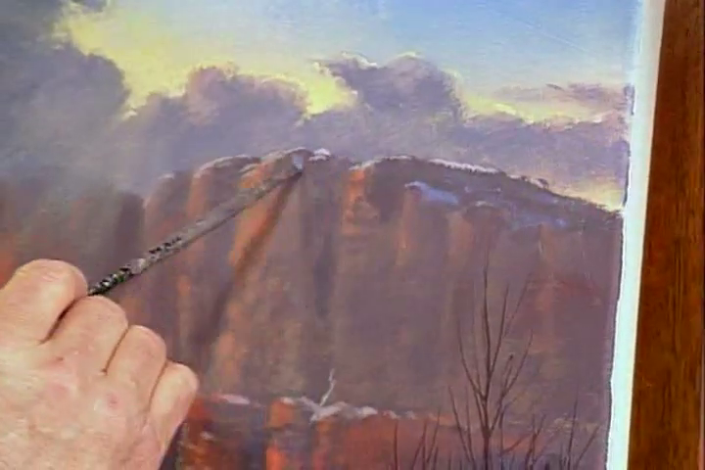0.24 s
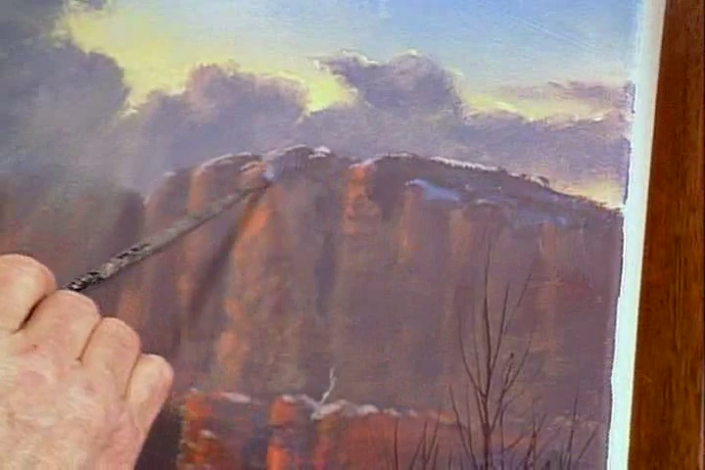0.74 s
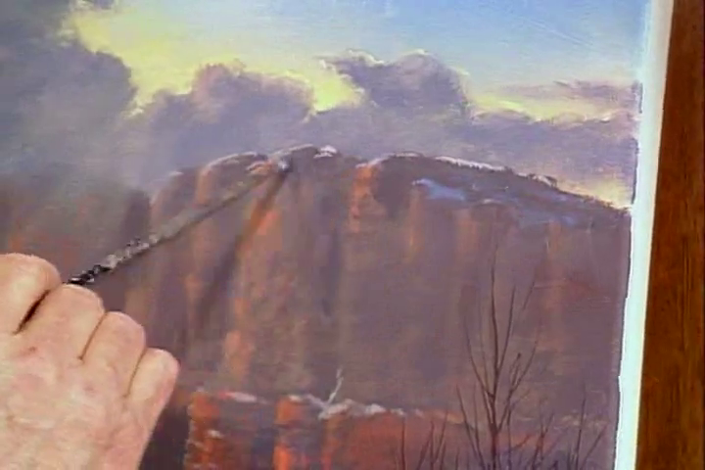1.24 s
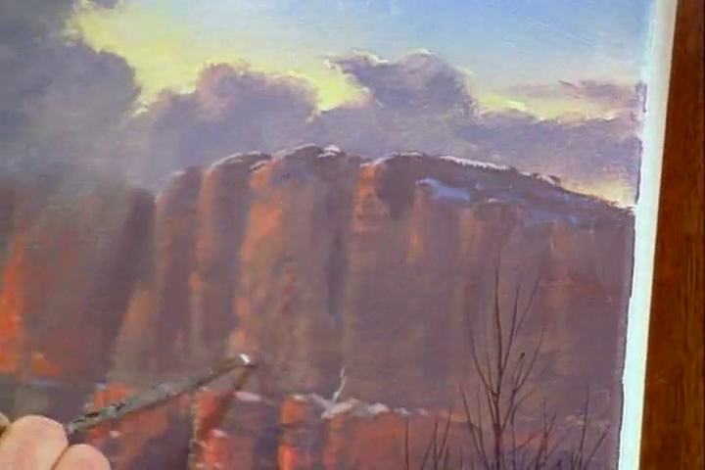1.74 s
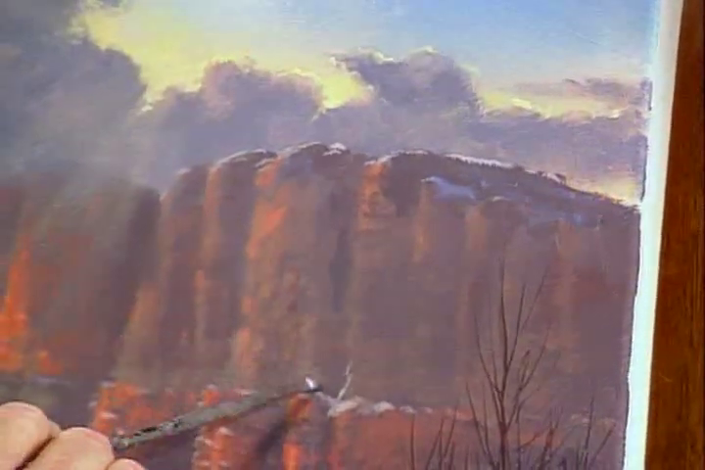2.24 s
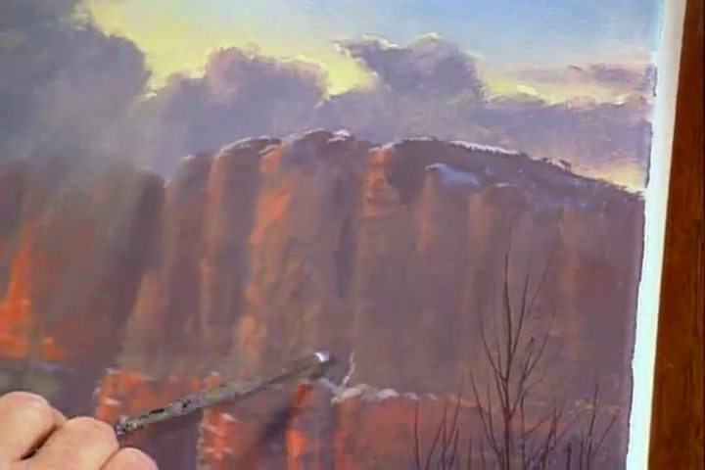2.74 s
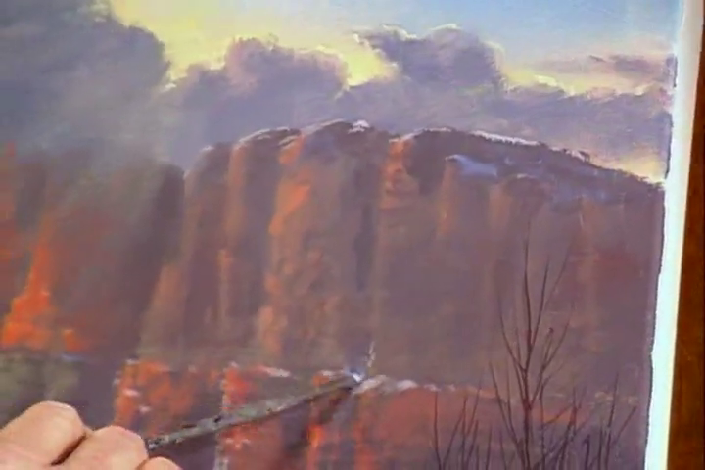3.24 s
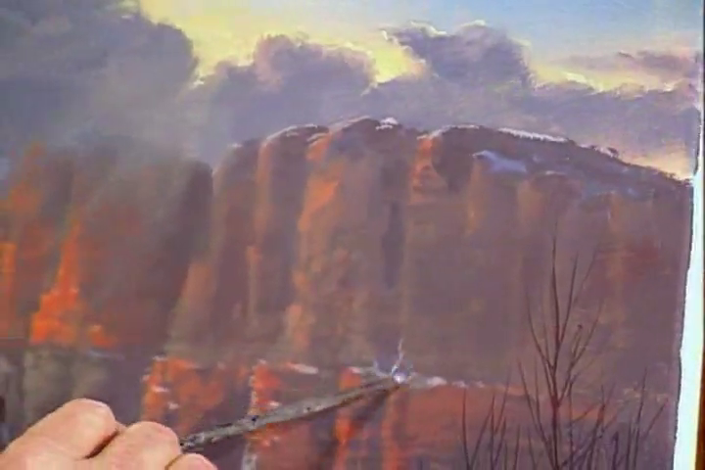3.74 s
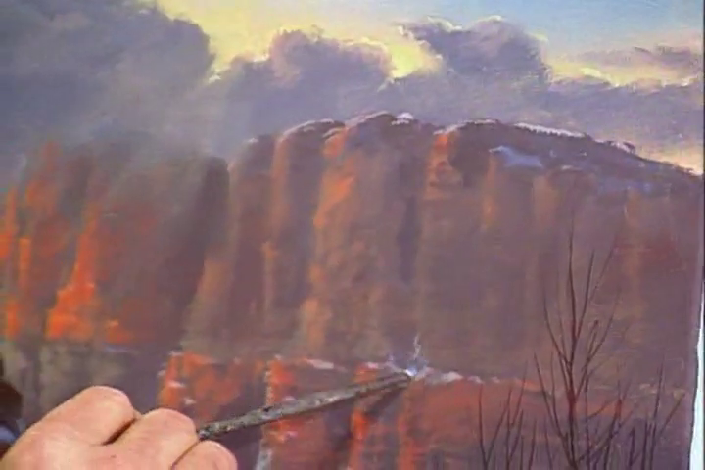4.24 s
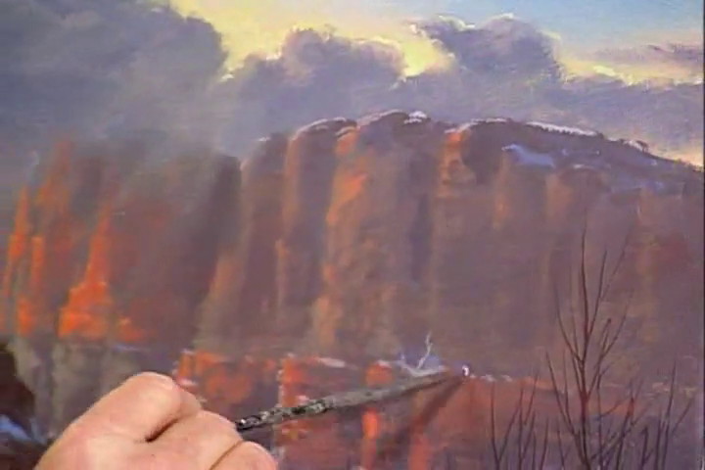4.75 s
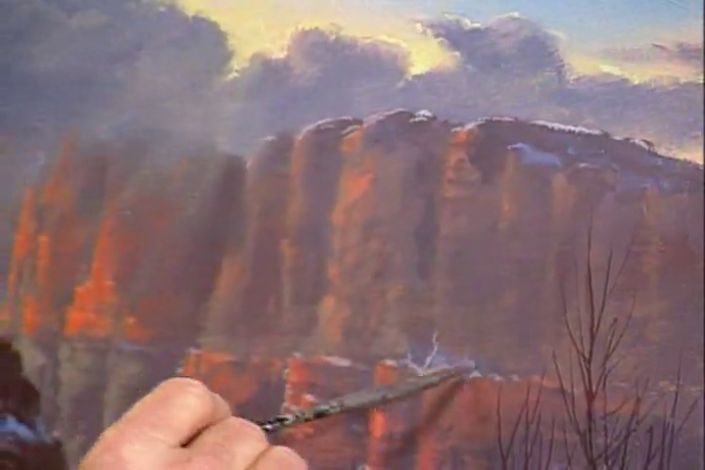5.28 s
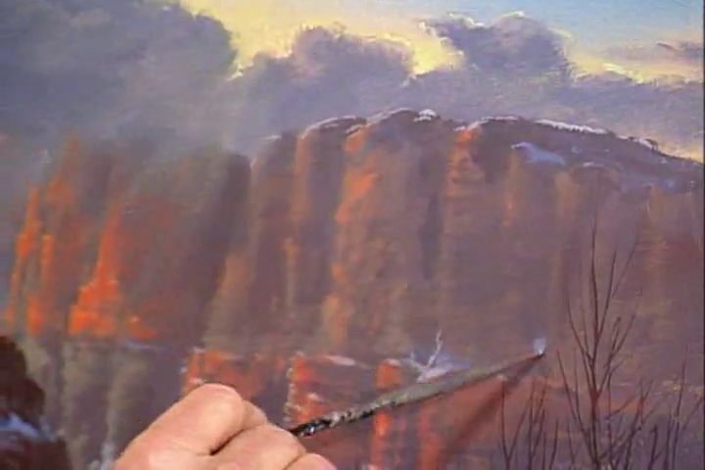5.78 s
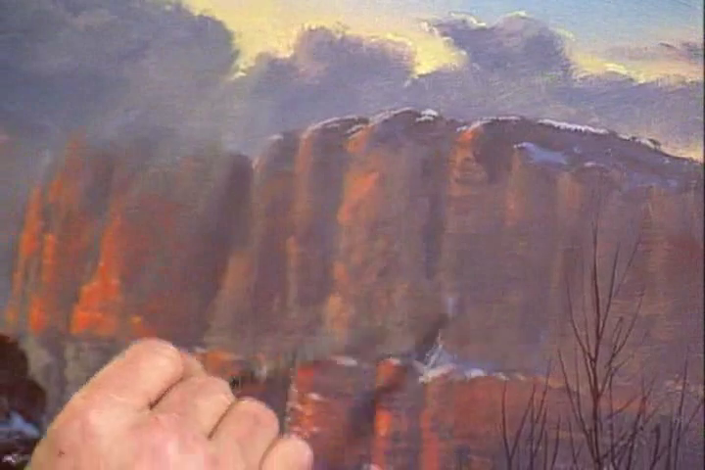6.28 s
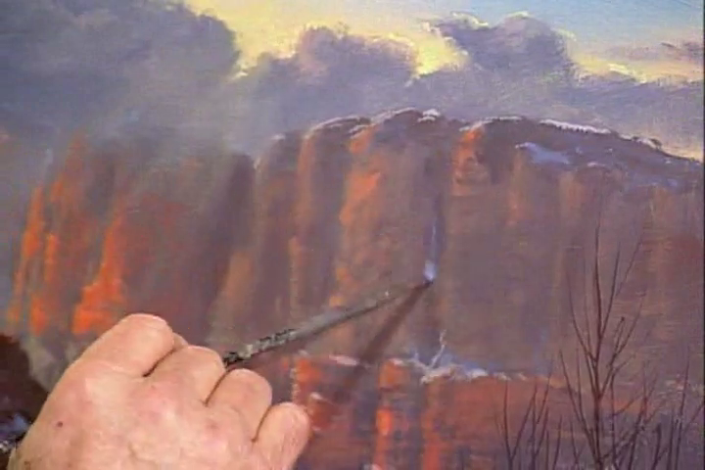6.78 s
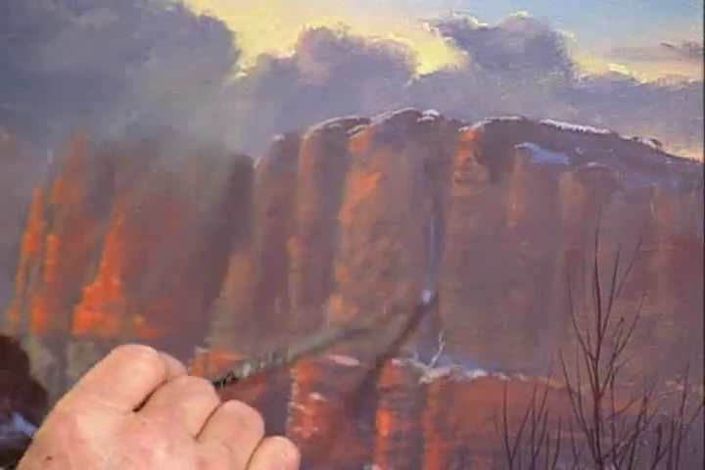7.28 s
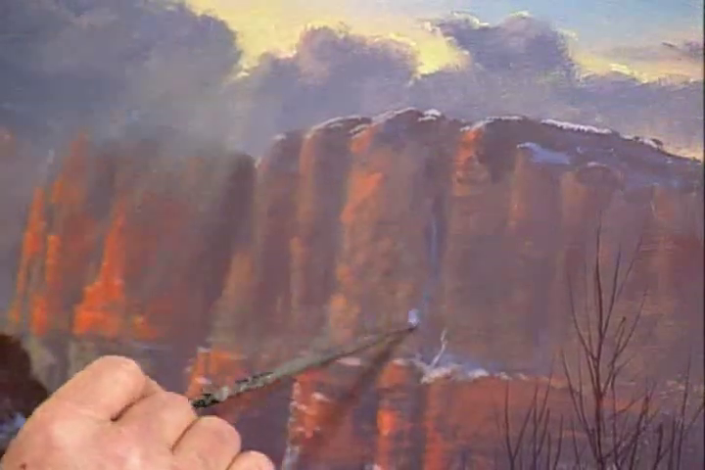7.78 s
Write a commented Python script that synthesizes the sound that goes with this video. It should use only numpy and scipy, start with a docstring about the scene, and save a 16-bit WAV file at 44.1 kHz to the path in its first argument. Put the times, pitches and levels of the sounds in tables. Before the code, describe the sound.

Soft scratchy brush strokes and faint taps on stretched canvas, with a low electrical hum in a quiet room.

```python
"""Bristle brush on canvas

A small brush works paint onto a canvas in a quiet studio: quick scrubs, then light strokes and dabs.
Stick-slip friction on the weave makes the bristles hiss and drives the cloth, a stretched membrane,
into soft drumming. Mains hum, a fan, a thin electronic whine and low room noise lie under it all."""
import sys
import numpy as np
from scipy import signal
from scipy.fft import rfft, irfft, next_fast_len
from scipy.io import wavfile
from scipy.ndimage import map_coordinates

SR = 44100
rng = np.random.default_rng(int(sys.argv[2]) if len(sys.argv) > 2 else 0)


def unload_wav(signal):
    """Save mono or channel-first audio to the path in sys.argv[1] as 16-bit WAV at rate SR, clipped to [-1, 1]."""
    wavfile.write(
        sys.argv[1],
        SR,
        np.round(np.clip(np.atleast_2d(signal).T, -1, 1) * 32767).astype(np.int16),
    )


N = 353682


def amp(db):
    """Amplitude ratio of a level in decibels."""
    return 10 ** (np.asarray(db) / 20)


def unit(x):
    """Normalisation to rms 1."""
    return x / np.sqrt(np.mean(x ** 2) + 1e-20)


def seconds():
    """The time of every sample."""
    return np.arange(N) / SR


def wobble(rate):
    """Smooth random modulation: a spline through `rate` Gaussian knots a second."""
    return map_coordinates(rng.standard_normal(int(N * rate / SR) + 4), [seconds() * rate])


def filtered(x, response):
    """Linear filtering: the spectrum of x times a frequency response."""
    size = next_fast_len(N + SR // 2)
    return irfft(rfft(x, size) * response(np.fft.rfftfreq(size, 1 / SR)), size)[:N]


def coloured(x, spectrum):
    """Spectral shaping by (frequency [Hz], gain [dB]) points on a log axis, at rms 1."""
    f, db = np.transpose(spectrum)
    return unit(filtered(x, lambda hz: amp(np.interp(np.log(hz + 1), np.log(f), db))))


def boosted(x, peaks, half_width=.095):
    """Resonances and valleys: a Gaussian hump or dip for each (frequency [Hz], gain [dB]) pair."""
    pairs = np.reshape(peaks, (-1, 2))
    return filtered(x, lambda f: amp(sum(db * np.exp(-((f / hz - 1) / half_width) ** 2)
                                         for hz, db in pairs)))


def resonance(x, centre_hz, width_hz):
    """Forced response of one damped mode, at rms 1."""
    return unit(signal.lfilter(*signal.iirpeak(centre_hz, centre_hz / width_hz, SR), x))


def reflected(x, delay_ms, share):
    """Comb filtering: x interferes with a weaker, later copy."""
    return (x + share * np.roll(x, round(delay_ms * SR / 1000))) / np.hypot(1, share)


def rings(events, attack, t60):
    """Free decay of a struck mode for each (time [s], peak level [dB], frequency [Hz]) row."""
    out, t = np.zeros(N + SR), np.arange(SR // 4) / SR
    for start, db, hz in events:
        onset = 1 - np.exp(-(t / attack) ** 2)
        ring = np.sin(2 * np.pi * hz * t) * onset * amp(-60 * t / t60)
        out[round(start * SR):][:len(t)] += amp(db) * ring / np.abs(ring).max()
    return out[:N]


def tone(hz, db, waver_rad):
    """A sinusoid of given rms level under random phase modulation."""
    phase = 2 * np.pi * (hz * seconds() + rng.random()) + waver_rad * wobble(2.31)
    return np.sqrt(2) * amp(db) * np.sin(phase)


def background(mains_hz=60.01, whine_hz=1500):
    """Superposition of line spectra (hum, fan, whine) and the continuous spectrum of room noise."""
    # slow drift: (time [s], hum gain [dB], rumble level [dB], midrange noise level [dB])
    drift = [(0, 0, -62.5, -68), (1.7, -0.4, -87, -83), (4, -1.25, -64.5, -70), (8, -0.5, -67, -71)]
    # mains hum: (harmonic number, rms level [dB])
    hum_harmonics = [(1, -43.5), (2, -64.5), (3, -60), (4, -74), (5, -66.5), (6, -78), (7, -70.5),
                     (9, -78.5), (10, -77.5), (11, -86)]
    # fan motor: (frequency [Hz], rms level [dB])
    fan_partials = [(30.1, -57), (116.2, -67.5), (497, -76.5), (539, -79.5), (839.3, -83), (1077.7, -93)]
    # electronic whine: (harmonic number, rms level [dB])
    whine_harmonics = [(1, -79.4), (2, -86.3), (3, -86.1), (4, -88.2), (5, -86.8), (6, -87.2), (8, -82),
                       (9, -93), (10, -102)]
    # steady rumble and hiss: (frequency [Hz], relative spectral density [dB])
    air_spectrum = [(8, 1.5), (14, 4), (75, -1), (120, 3), (200, -2.5), (300, -11), (520, -15.5),
                    (720, -21), (1300, -27), (2600, -29.5), (10000, -30.5), (11800, -37.5), (12900, -46),
                    (15000, -48)]
    times, *levels = np.transpose(drift)
    hum_gain, rumble_gain, wash_gain = (amp(np.interp(seconds(), times, db)) for db in levels)
    hum = sum(tone(k * mains_hz, db, waver_rad=.02) for k, db in hum_harmonics)
    fan = sum(tone(hz, db, waver_rad=.24) for hz, db in fan_partials)
    whine = sum(tone(k * whine_hz, db, waver_rad=.017) for k, db in whine_harmonics)
    air = amp(-57.5) * coloured(rng.standard_normal(N), air_spectrum)
    rumble = coloured(rng.standard_normal(N),
                      [(70, -18.5), (120, .5), (180, -4), (270, -9), (450, -32), (1200, -57)])
    wash = coloured(rng.standard_normal(N), [(120, -20), (260, 0), (500, -.5), (800, -6),
                                             (1500, -18), (3000, -31.5), (8000, -48)])
    return hum_gain * hum + fan + whine + air + rumble_gain * rumble + wash_gain * wash


def reverberation(x, t60):
    """Diffuse wall reflections: convolution with exponentially decaying noise."""
    t = np.arange(SR // 2) / SR
    tail = rng.standard_normal(len(t)) * amp(-60 * t / t60) * (t > .003)
    return signal.fftconvolve(x, tail / np.linalg.norm(tail))[:N]


def catches(rate, spread_db):
    """Stick-slip as a Poisson process: bristles slip off threads in impulses of random size."""
    slipping = rng.random(N) < rate / SR
    return unit(slipping * rng.standard_normal(N) * amp(spread_db * rng.standard_normal(N)))


def contact(peak_s, rise, fall):
    """Contact force envelope: the brush presses in and lifts off in one smooth arc."""
    t = seconds() - peak_s
    arc = np.zeros(N)
    touching = (t > -rise) & (t < fall)
    t = t[touching]
    arc[touching] = np.cos(np.pi / 2 * t / np.where(t < 0, rise, fall)) ** 1.37
    return arc


def dabs():
    """Impulsive excitation: tip landings, an easel bump and clicks of wet paint ring briefly."""
    # the tip lands on the cloth: (time [s], peak level [dB], frequency [Hz])
    landings = [(.505, -51, 580), (3.369, -51.5, 475), (4.385, -47.5, 513), (4.396, -48.5, 517),
                (4.439, -49.5, 446), (4.794, -51, 530), (5.038, -51, 535), (5.793, -53.5, 520),
                (6.021, -47.5, 570), (6.196, -52, 600), (6.368, -56, 557), (6.588, -52, 550),
                (6.788, -48, 525), (7.019, -48, 520), (7.498, -46.5, 513)]
    # dull scuff of the tuft splaying as it lands: (frequency [Hz], relative spectral density [dB])
    scuff_spectrum = [(150, -12), (400, 0), (700, -2), (1100, -14), (2200, -32), (6000, -50)]
    # the canvas bumps its easel: (time [s], peak level [dB], frequency [Hz])
    easel_bumps = [(6.318, -35.5, 180)]
    # sticky paint: (time [s], peak level [dB], frequency [Hz], 60 dB decay time [s])
    paint_clicks = [(6.0248, -41, 7700, .003), (6.592, -52, 4800, .0012), (6.795, -43, 7300, .0008)]
    taps = rings(landings, attack=.002, t60=.014)
    splay = sum(amp(db) * contact(start + .003, rise=.003, fall=.016) for start, db, _ in landings)
    scuffs = amp(-10) * splay * coloured(catches(rate=10000, spread_db=-.5), scuff_spectrum)
    bumps = rings(easel_bumps, attack=.0065, t60=.016)
    clicks = sum(rings([click], attack=.00013, t60=t60) for *click, t60 in paint_clicks)
    return taps + scuffs + bumps + clicks


def strokes():
    """Friction drives the membrane, the touched spot and the bristles; all grow with pressure."""
    # brush strokes: (time of firmest contact [s], rise [s], fall [s], pressure re a medium stroke [dB],
    # extra hiss [dB], frequency of the touched spot [Hz], gain of its ring [dB])
    gestures = [(.165, .072, 0.1, -1, -3, 860, 3.5), (.328, 0.021, 0.019, -3, -9, 950, 4),
                (.416, 0.037, 0.045, 2, -4, 1160, -6), (.52, 0.023, 0.031, 6.5, 0, 850, 6),
                (.625, 0.054, 0.051, 0.5, -6, 870, 0), (.731, .03, 0.026, -0.5, -3.5, 1150, -6),
                (.827, 0.027, 0.038, 1, -3.5, 1170, -4), (.921, 0.04, 0.05, 3, 1, 895, -6),
                (1.042, 0.052, 0.058, 2, -5, 854, -1), (1.143, 0.033, 0.038, 2, 0.5, 790, 1),
                (1.22, 0.087, 0.12, -5, -7, 860, -5), (1.44, 0.045, 0.054, -4.5, -6, 800, -9),
                (2.605, 0.031, 0.053, -4, -3, 520, -10), (2.999, 0.032, 0.043, -1.5, -8, 520, 0),
                (3.272, 0.041, 0.049, -5.5, -1, 480, 5), (3.818, 0.027, 0.088, 0, -8, 1050, -8),
                (4.28, 0.29, 0.09, -6, -3, 1080, -2), (4.59, 0.047, 0.02, -3, -8, 1000, 5),
                (4.721, 0.028, 0.04, 6, -5, 760, 5), (4.803, 0.024, 0.024, 1.5, -21, 1150, -3),
                (5.062, 0.034, 0.11, 2, -4.5, 1060, 1.5), (5.413, 0.032, 0.1, 3, 0, 1030, 5),
                (5.868, 0.04, 0.083, -2, -3.5, 760, 1), (6.29, .033, 0.051, -3.5, -10, 1010, 1),
                (6.805, 0.125, 0.13, -2, -2.5, 525, 8.5), (7.1, 0.044, 0.14, 0, -2.5, 630, 7.5),
                (7.595, 0.079, 0.079, -5, -1, 600, 5), (7.838, 0.02, 0.069, -5.5, -4.5, 600, 5)]
    # drumming of the stretched cloth: (frequency [Hz], relative spectral density [dB])
    cloth_spectrum = [(100, -10), (270, 2.5), (400, -1), (520, 3), (700, -4.5), (1000, -8.5), (1500, -13),
                      (2100, -17.5), (2800, -26.5), (6000, -38.5)]
    # bristle hiss: (frequency [Hz], relative spectral density [dB])
    bristle_spectrum = [(700, -39), (2000, -9), (3050, 1.5), (3800, -.5), (4700, 0), (5500, -2.5),
                        (7000, -.5), (9800, .5), (11800, 1), (12500, -7), (13400, -40)]
    # tuft resonances at each brush angle: (start [s], then 3 pairs of frequency [Hz], gain [dB])
    tuft_modes = [(0, 2130, 8, 7600, 3, 11000, 4), (2, 2200, 4, 4100, 2, 9300, 1.5),
                  (5, 3300, 5, 4550, 5.5, 9000, 2.5), (6.5, 4650, 6.5, 6600, 3, 9700, 7)]
    # cloth response at each place touched:
    # (start [s], then frequency [Hz], gain [dB] for the low mode, the valley and the upper mode)
    membrane_modes = [(0, 555, 3, 700, -3, 840, 3), (2, 510, 2, 640, -2, 1250, 1.5),
                      (6.5, 520, 1.5, 1150, -3, 1640, 2.5)]
    cloth_db, hiss_db, spot_db = -58.5, -65.5, -69  # base levels of a medium stroke
    hiss_growth = 1.03  # dB per dB of pressure: firm strokes are slightly brighter
    drum_exponent = .62  # below 1: the cloth still drums under the lightest touch
    slips = catches(rate=11000, spread_db=1.5)
    cloth = coloured(slips, cloth_spectrum)
    clumping = amp(1.8 * wobble(220))  # bristles catch and let go in groups
    hiss = unit(coloured(slips, bristle_spectrum) * clumping)
    tufts = [(start, boosted(hiss, modes)) for start, *modes in tuft_modes]
    membranes = [(start, boosted(cloth, modes)) for start, *modes in membrane_modes]
    plucks = catches(rate=3000, spread_db=5.5)  # threads right under the tip feed the local mode
    out = np.zeros(N)
    for peak_s, rise, fall, pressure_db, extra_db, spot_hz, ring_db in gestures:
        spot = resonance(resonance(plucks, spot_hz, width_hz=184), spot_hz, width_hz=240)
        tuft = [sound for start, sound in tufts if start <= peak_s][-1]
        membrane = [sound for start, sound in membranes if start <= peak_s][-1]
        # the hand, at a new distance each time, reflects the rasp
        rasp = reflected(tuft, delay_ms=rng.uniform(.8, 2.2), share=.25)
        rasp *= amp(hiss_db + hiss_growth * pressure_db + extra_db)
        drum = amp(pressure_db) * (amp(cloth_db) * membrane + amp(spot_db + ring_db) * spot)
        arc = contact(peak_s, rise, fall)
        out += arc ** drum_exponent * drum + arc * rasp
    return out * amp(.9 * wobble(90))  # weave and paint make the drag uneven


def scene():
    """Superposition of the brush's direct sound, its reverberant field and the background."""
    brush = strokes() + dabs()
    room = amp(-16) * reverberation(brush, t60=.28)
    return (brush + room + background())[None]


def record(dry):
    """Band limiting by an ideal low-pass filter."""
    cutoff_hz = 15100
    return filtered(dry[0], lambda hz: hz < cutoff_hz)[None]


dry = scene()
out = record(dry)
unload_wav(out)
```